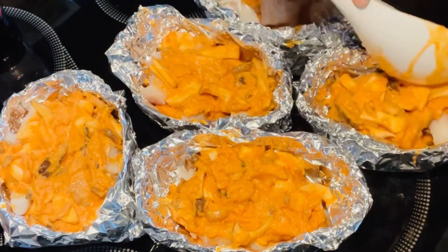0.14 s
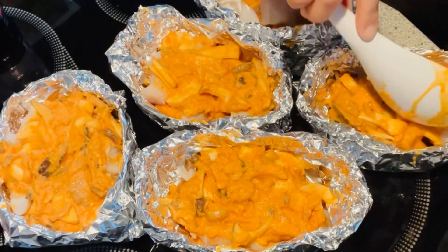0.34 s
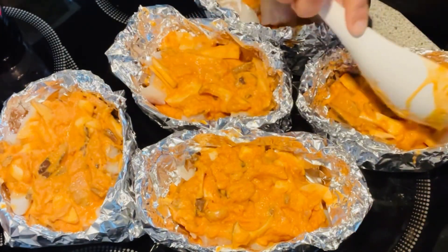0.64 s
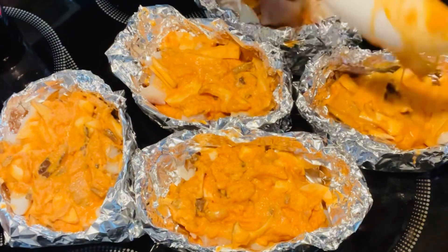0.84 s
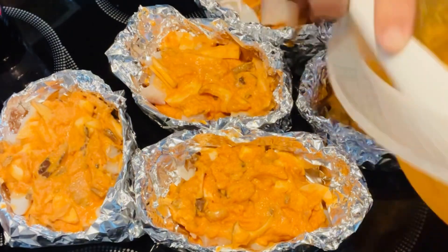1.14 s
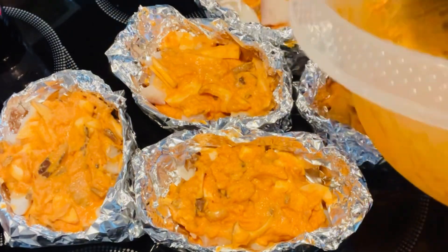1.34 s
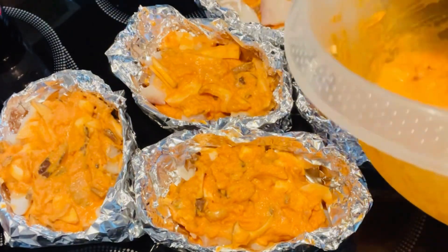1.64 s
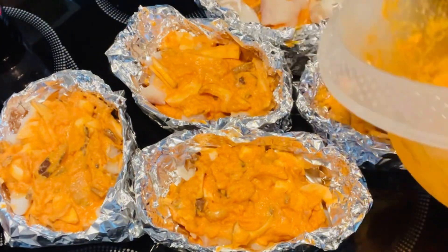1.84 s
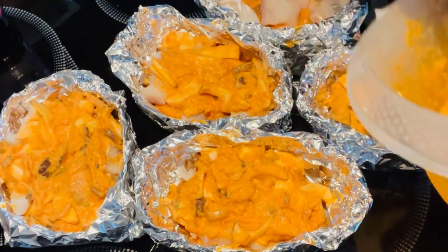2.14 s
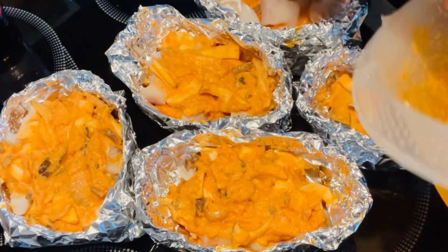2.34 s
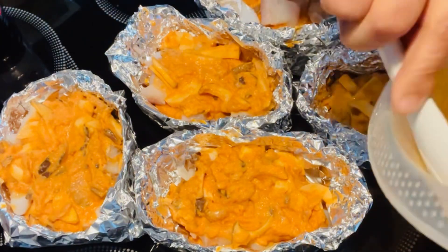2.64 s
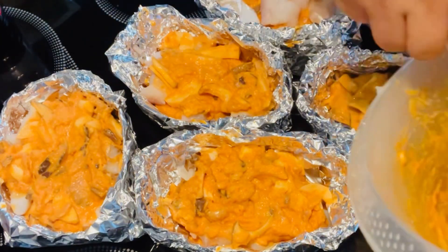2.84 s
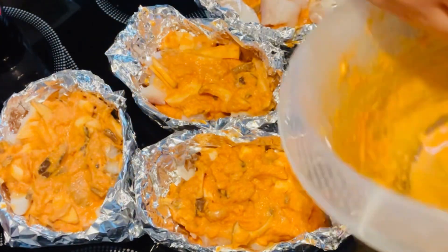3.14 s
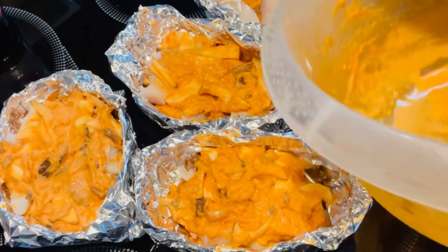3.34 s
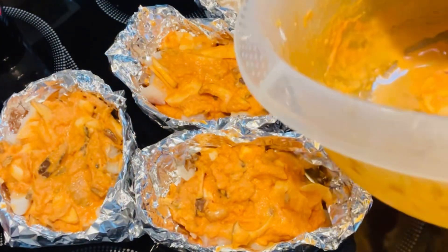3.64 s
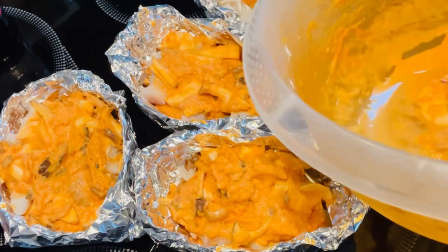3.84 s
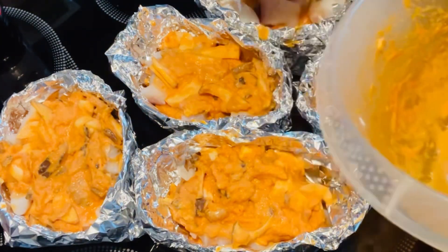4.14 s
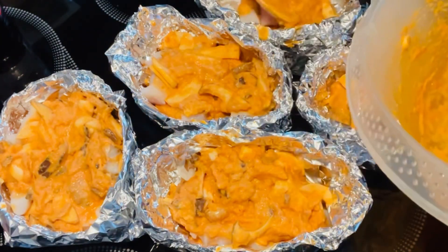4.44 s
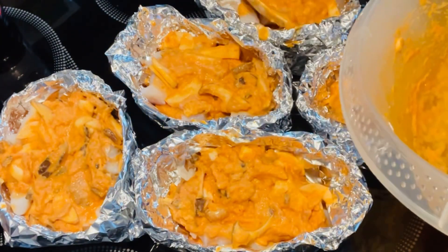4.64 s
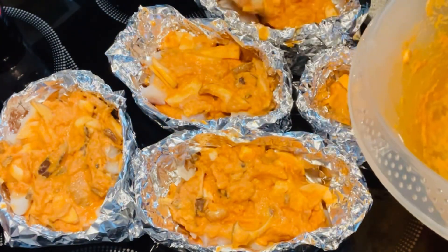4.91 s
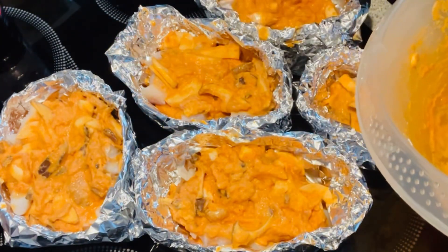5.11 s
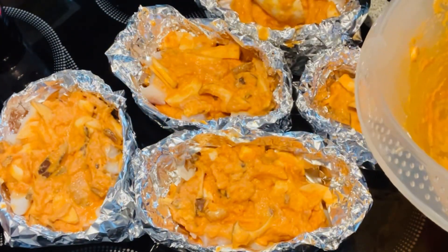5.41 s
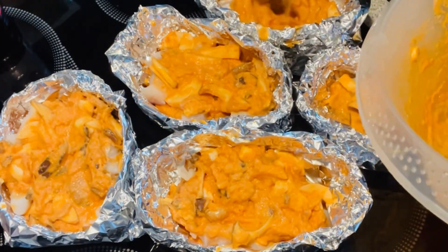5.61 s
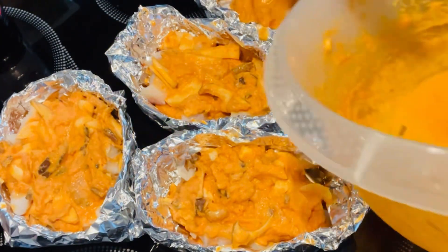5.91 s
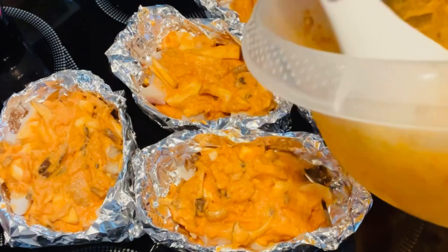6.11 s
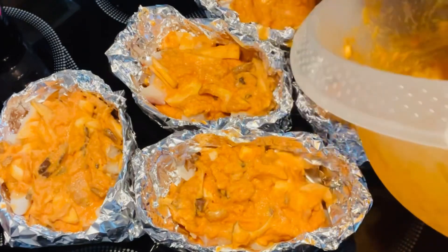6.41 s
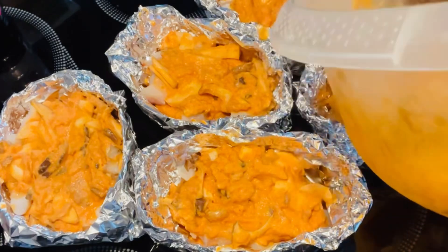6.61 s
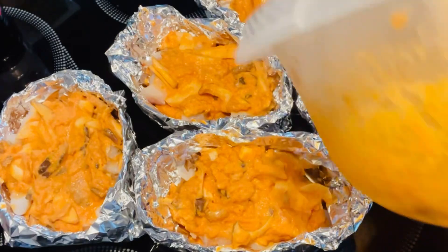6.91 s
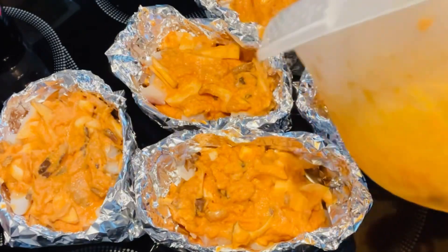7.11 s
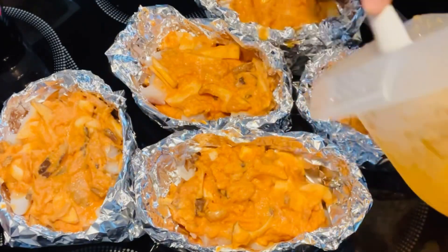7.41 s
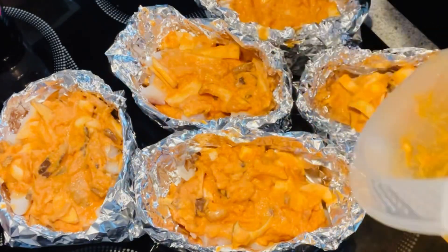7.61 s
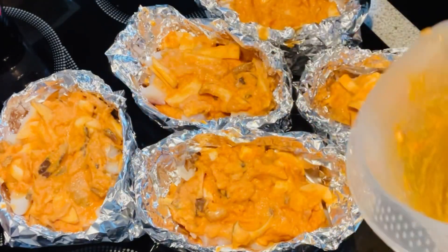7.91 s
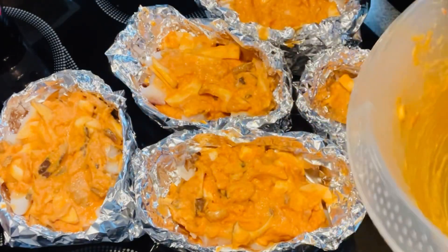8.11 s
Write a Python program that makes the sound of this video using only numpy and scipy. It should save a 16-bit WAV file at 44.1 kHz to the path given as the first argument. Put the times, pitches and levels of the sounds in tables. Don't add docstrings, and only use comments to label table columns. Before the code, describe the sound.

Hollow plastic bowl knocks and gritty spoon scrapes come in two busy bursts, split by a quiet spell of foil snaps and sauce bubbles.

```python
import sys
import numpy as np
from scipy import signal
from scipy.fft import rfft, irfft, next_fast_len
from scipy.io import wavfile

SR = 44100
rng = np.random.default_rng(int(sys.argv[2]) if len(sys.argv) > 2 else 0)


def boost(x):
    u = np.asarray(x, float) / 20
    return 10 ** u


def store_pcm(level_fs):
    pcm = np.round(np.clip(level_fs, -1, 1) * 32767).astype(np.int16)
    wavfile.write(sys.argv[1], SR, np.atleast_2d(pcm).T)


N = 364266


def rms_one(x):
    return x / np.sqrt(np.mean(x ** 2) + 1e-20)


def drift(rate_hz):
    pole = np.exp(-2 * np.pi * rate_hz * 40 / SR)
    noise = rng.standard_normal(N // 40 + 2002)
    slow = signal.lfilter([1], [1, -2 * pole, pole * pole], noise)[2000:]
    return np.interp(np.arange(N) / 40, np.arange(len(slow)), rms_one(slow))


def ring(drive, hz, t60_s):
    radius, w = boost(-60 / (t60_s * SR)), 2 * np.pi * hz / SR
    return signal.lfilter([0, np.sin(w)], [1, -2 * radius * np.cos(w), radius * radius], drive + 1e-18)


def colour(x, spectrum):
    hz, db = np.transpose(spectrum)
    size = next_fast_len(N)
    log_hz = np.log(np.fft.rfftfreq(size, 1 / SR) + 1)
    gain_db = np.interp(log_hz, np.log(hz), db, left=-80, right=db[-1])
    return rms_one(irfft(rfft(x, size) * boost(gain_db), size)[:N])


def grit(slips_per_s, spread_db):
    sizes = boost(spread_db * np.minimum(rng.exponential(1, N), 5))
    signs = rng.choice([-1, 1], N)
    return rms_one(sizes * signs * (rng.random(N) < slips_per_s / SR))


def grains(slips_per_s, low_hz, high_hz, cycles):
    slips = grit(slips_per_s, 2.7)
    dealt = rng.integers(0, 11, N)
    pitches_hz = np.geomspace(low_hz, high_hz, 11) * rng.uniform(.97, 1.03, 11)
    return rms_one(sum(ring(slips * (dealt == k), hz, cycles / hz) for k, hz in enumerate(pitches_hz)))


def patchy(x, edges_hz, patch_db, rate_hz):
    out = np.zeros(N)
    for k, band_hz in enumerate(zip(edges_hz, edges_hz[1:])):
        sos = signal.butter(2, band_hz, "band", fs=SR, output="sos")
        out += (-1) ** k * boost(patch_db * drift(rate_hz)) * signal.sosfilt(sos, x)
    return out


def swells(start_s, length_s, levels_db, pace_db_per_s):
    rise, fall = pace_db_per_s
    t, power = np.arange(N // 64 + 2) * 64 / SR, 0
    for s, hold_s, db in zip(start_s, length_s, levels_db):
        short_db = rise * np.maximum(s - t, 0) + fall * np.maximum(t - s - hold_s, 0)
        power = power + boost(db - np.minimum(short_db, 120)) ** 2
    return np.interp(np.arange(N) / SR, t, np.sqrt(power))


def rough_tones(modes, wander_db):
    white = rng.standard_normal(N)
    return sum(boost(db + wander_db * drift(2.2)) * rms_one(ring(white, hz, 2.0 / width_hz))
               for hz, width_hz, db in modes)


def struck(modes, s, levels_db, favoured_hz, lag_cycles, rise_cycles, focus_db, luck_db):
    out, luck = np.zeros(N), rng.standard_normal((len(s), len(modes)))
    for k, (hz, db, t60_s) in enumerate(modes):
        clicks = np.zeros(N)
        off_db = np.minimum(focus_db * np.abs(np.log2(hz / favoured_hz)), 14)
        at = ((s + lag_cycles / hz) * SR).astype(int)
        clicks[at] = boost(levels_db + db - off_db + luck_db * luck[:, k])
        out += ring(clicks, hz, t60_s) - ring(clicks, hz, rise_cycles / hz)
    return out


def bent_rings(rows, rise_cycles, sag_cycles):
    out, t = np.zeros(N), np.arange(int(.25 * SR)) / SR
    for s, db, hz, t60_s in rows:
        x = t * hz
        turns = x + sag_cycles * (1 - np.exp(-x))
        shape = boost(db - 60 * t / t60_s) * (1 - np.exp(-x / rise_cycles))
        out[int(s * SR):][:len(t)] += shape * np.sin(2 * np.pi * turns)
    return out


# throbs_off_tone, rms_db
HUM = [(0, -57.5), (1, -67), (-1, -80)]
# pitch_hz, width_hz, level_db
MOTOR = [(98.24, 2.6, -67), (154.4, 4.1, -75.5), (3240, 140, -76.5), (4070, 68, -83.5), (4275, 150, -83),
         (5130, 65, -79.5), (5470, 62, -82.5), (7500, 150, -89)]
# start_s, length_s, level_db
DRONE = [(0.517, 0.38, -67), (0.905, 0.15, -62.5), (3.22, 0.11, -68.5), (3.406, 0.13, -60.5),
         (3.794, 0.068, -78), (4.051, 0.12, -74), (4.306, 0.3, -70), (4.617, 0.075, -69),
         (4.779, 0.046, -69), (4.881, 0.16, -68), (5.126, 0.036, -67), (5.36, .05, -69),
         (5.475, 0.064, -66), (5.706, 0.1, -71.5), (5.885, 0.2, -65.5)]
# pitch_hz, width_hz, level_db
DRONE_MODES = [(297, 9.3, 1), (340, 25, 0.5), (420.5, 25, -3), (517, 27, -7.5), (590, 37, -3.5),
               (764, 490, -6.5), (1020, 110, -21)]
# freq_hz, level_db_per_hz
RUMBLE = [(44, -28.5), (75, -6), (161, -7), (240, -15), (500, -20.5), (699, -22.5), (1300, -28),
          (1900, -67)]
# freq_hz, level_db_per_hz
HISS = [(760, -39), (1300, -13), (2060, -12.5), (3420, -4.5), (4440, -3), (8520, -13), (10400, -20),
        (16000, -22.5)]


def kitchen_hum():
    motor_hz, throb_hz, throb_top_s = 50.53, 2.52, 4.27
    drone_pace_db_per_s = (140, 230)
    t = np.arange(N) / SR - throb_top_s
    hum = sum(boost(db) * np.sqrt(2) * np.sin(2 * np.pi * (motor_hz + k * throb_hz) * t) for k, db in HUM)
    drone = swells(*np.transpose(DRONE), drone_pace_db_per_s) * rms_one(rough_tones(DRONE_MODES, 4.2))
    rumble = boost(-66.5 + 1.7 * drift(1.3)) * colour(rng.standard_normal(N), RUMBLE)
    hiss_gain = boost(-70.5 + 1.3 * drift(3.0))
    air = colour(rng.standard_normal(N), HISS)
    hiss = hiss_gain * patchy(air, [600, 2800, 5500, 9000, 17000], 1.4, 6.0)
    buzz = swells([0], [0.48], [0], drone_pace_db_per_s) * rough_tones([(166, 6.0, -66)], 3.3)
    hum *= boost(.7 * drift(3))
    return hum + buzz + rough_tones(MOTOR, 1.5) + drone + rumble + hiss


def room(x):
    t60_s, wall_cut_hz = 0.41, 4200
    size = next_fast_len(N + SR)
    w = 2 * np.pi * np.fft.rfftfreq(size, 1 / SR)
    dull = 1 / (1 + 1j * w / (2 * np.pi * wall_cut_hz))
    echoes = 0
    for k, lag_s in enumerate(rng.uniform(0.0083, 0.03, 8)):
        loop = boost(-60 * lag_s / t60_s) * dull * np.exp(-1j * w * lag_s)
        echoes = echoes + (-1) ** k * loop / (1 - loop)
    return irfft(rfft(x, size) * echoes, size)[:N]


# start_s, peak_db, pitch_hz
PLOPS = [
    (5.1143, -51, 1530),
    (5.322, -52.5, 1370),
    (5.362, -47.5, 1324),
    (5.455, -52, 1570),
    (5.6235, -50, 1590),
    (5.469, -55, 1550),
]


def plops():
    out, t = np.zeros(N), np.arange(int(.05 * SR)) / SR
    uneven = boost(5 * drift(250) - 7)
    for s, db, hz in PLOPS:
        shape = boost(db - 60 * t / 0.046) * np.minimum(t / 0.00096, 1)
        overtone = 0.83 * np.sin(2 * np.pi * 1.96 * hz * t)
        out[int(s * SR):][:len(t)] += shape * (np.sin(2 * np.pi * hz * t) + overtone)
    return out * uneven


def snaps(rows, octaves, click_db):
    lag_s, rise_s = .001, .0007
    out, rough = np.zeros(N), grit(12000, 3)
    t, half = np.arange(int(.12 * SR)) / SR, 2 ** (octaves / 2)
    for s, db, hz, t60_s in rows:
        i = int((s + lag_s) * SR)
        band = signal.butter(2, [hz / half, hz * half], "band", fs=SR, output="sos")
        dying = boost(-60 * t / t60_s) + 1.7 * boost(-60 * t / 0.0067)
        push = rough[i:i + len(t)] * dying * np.minimum(t / rise_s, 1)
        push[0] += boost(click_db)
        burst = signal.sosfilt(band, push)
        out[i:i + len(t)] += boost(db - 19.0) * burst / np.sqrt(np.mean(burst[:130] ** 2))
    return out


# start_s, peak_db, centre_hz, t60_s
SNAPS = [(0.2423, -33, 3800, 0.081), (0.2992, -28, 6000, 0.043), (0.3336, -35, 5400, 0.018),
         (0.5477, -39, 5860, .072), (0.595, -28.5, 4180, 0.056), (2.1994, -19, 3000, 0.071),
         (2.4754, -19.5, 2840, 0.046), (2.558, -36, 7000, 0.061), (4.0607, -28.5, 2883, 0.066),
         (4.6458, -41, 3340, 0.032), (5.1153, -33.5, 3860, 0.068), (5.3134, -31, 7500, .034),
         (5.3208, -20, 4310, 0.044), (5.3607, -30, 3040, 0.13), (5.3714, -33.5, 3200, 0.1),
         (6.6867, -38.5, 2490, 0.078), (7.0774, -21.5, 1950, 0.042), (7.7069, -32, 2990, 0.26),
         (7.7717, -32, 6350, 0.048), (7.9089, -25.5, 2980, 0.086)]


def foil_snaps():
    return snaps(SNAPS, octaves=2.6, click_db=10)


# start_s, peak_db, centre_hz, t60_s
CATCHES = [(0.7602, -40, 5600, .04), (1.7484, -12.5, 4800, 0.066), (1.8272, -22, 3760, 0.019),
           (2.29, -45, 3700, 0.18), (2.302, -30, 5300, 0.07), (2.4414, -28, 3800, .12),
           (2.8649, -22.5, 4340, 0.038), (2.9173, -24, 2970, 0.045), (2.9407, -15.5, 2900, 0.067),
           (2.9594, -30, 4650, .03), (2.9983, -27, 4500, .03), (3.0826, -33, 4500, .03),
           (1.4433, -34, 3000, 0.033), (1.508, -37, 1800, .03), (2.1772, -43, 3540, 0.023),
           (6.347, -28, 3000, .03), (6.743, -23, 1130, 0.036), (7.0445, -27, 3180, .03),
           (7.117, -20, 1510, .03), (7.126, -24, 2010, .03), (7.891, -39, 4500, 0.025),
           (3.258, -44.5, 4810, 0.03), (6.309, -24, 1440, 0.12), (6.398, -29.5, 1700, 0.08),
           (6.6204, -25, 1680, 0.032), (6.6548, -23, 4400, 0.062), (7.6171, -27, 3040, 0.026),
           (7.6745, -24, 1580, 0.089), (7.8012, -26, 5200, 0.027), (7.8376, -15.5, 2740, 0.055),
           (7.9269, -28, 2500, 0.04), (7.845, -21, 2980, 0.045), (1.2345, -16, 4500, .03),
           (1.762, -26, 7000, .05), (1.834, -30, 6000, .04), (1.863, -17, 3560, .03),
           (2.93, -23, 4500, .02), (3.022, -16, 3240, .04), (3.0465, -33, 4600, .03)]


def edge_catches():
    return snaps(CATCHES, octaves=1.36, click_db=21)


# start_s, length_s, level_db
RUSTLE = [
    (0.235, .11, -59),
    (0.544, 0.13, -64),
    (0.696, 0.26, -77.5),
    (3.396, 0.32, -85),
    (4.059, 0.0078, -54.5),
    (4.463, 0.11, -82),
    (4.647, 0.036, -66.5),
    (5.114, .01, -64),
    (5.318, 0.0096, -52),
    (5.551, 0.28, -72),
]
# freq_hz, level_db_per_hz
FOIL = [(800, 3.5), (1500, 7.5), (4000, 5), (8000, 5), (12000, -2), (15500, -1)]


def foil_crinkle(foil_gain, fine):
    sheet = colour(fine, FOIL)
    crinkle = rms_one(.55 * grains(2500, 5000, 15500, 60) + sheet)
    rustle = swells(*np.transpose(RUSTLE), (3300, 310)) * boost(3.1 * drift(66)) * sheet
    return foil_gain * crinkle + rustle


def judder():
    s, wall_db = np.transpose(KNOCKS)[:2]
    return swells(s + .008, 0 * s, wall_db - 19, (6000, 394))


# start_s, length_s, wall_db, edge_db, foil_db
STROKES = [(0.03, 0.14, -80, -76, -81), (0.174, 0.32, -69.5, -88, -87), (1.08, 0.18, -60.5, -67, -73),
           (1.232, 0.059, -52.5, -57, -52.5), (1.333, 0.06, -55, -51.5, -46.5),
           (1.41, 0.1, -52.5, -65.5, -64), (1.653, 0.086, -71, -55.5, -71), (1.745, .12, -58, -55.5, -48.5),
           (2.056, 0.095, -56, -49, -48.5), (2.164, 0.071, -47, -55, -51), (2.29, 0.015, -47.5, -53, -47),
           (2.44, 0.018, -47, -47.5, -39), (2.688, 0.16, -75, -53.5, -50), (2.863, 0.12, -56, -52, -51),
           (3.01, 0.036, -64, -49, -50.5), (3.247, 0.048, -68, -68, -71),
           (6.161, 0.113, -58.5, -57.5, -50.5), (6.273, 0.085, -51, -57, -57),
           (6.576, 0.2, -58, -56.5, -54.5), (6.617, 0.21, -59.5, -56.5, -54.5),
           (7.001, 0.13, -58.5, -50.5, -51), (7.349, 0.078, -57, -47.5, -63),
           (7.426, 0.29, -58.5, -54.5, -52.5), (7.717, 0.21, -59.5, -56, -55.5),
           (7.965, 0.26, -66.5, -70, -72.5)]
# start_s, length_s, level_db
SPOON_RUBS = [(1.062, 0.18, -63.5), (1.22, 0.018, -46.5), (1.353, 0.054, -55.5), (1.427, 0.059, -61.5),
              (1.644, 0.045, -49), (1.75, 0.12, -54.5), (2.037, 0.079, -51), (2.174, 0.042, -49.5),
              (2.298, 0.011, -54.5), (2.426, 0.052, -50.5), (2.684, 0.084, -48.5), (2.903, 0.098, -53.5),
              (3.032, 0.095, -61), (3.258, 0.052, -68), (6.14, 0.15, -60), (6.292, 0.027, -60),
              (6.394, 0.02, -61.5), (6.589, .05, -58.5), (6.668, 0.088, -51.5), (6.786, .03, -63),
              (7.033, 0.075, -50.5), (7.35, 0.066, -47.5), (7.494, 0.14, -56), (7.716, 0.19, -57),
              (7.967, 0.18, -70)]
# pitch_hz, level_db, t60_s
RUBBED_WALL = [(328.4, -4, 0.034), (377.5, -3, 0.034), (460, -8.5, .03), (553.3, 4.5, 0.026),
               (620, -2, 0.036), (740, -1, 0.027), (877, -1, 0.025), (1020, -9.5, 0.0343)]
# pitch_hz, level_db, t60_s
LIP = [(1625, -3, .17), (1668, 0, .22), (1735, -2, .17), (1030, -6, .2)]
# freq_hz, level_db_per_hz
EDGE = [(1800, -9), (2700, -2.5), (3600, 9.5), (5000, -4), (6500, -17.5), (8500, -3.5)]


def scrape():
    s, length_s, wall_db, edge_db, foil_db = np.transpose(STROKES)
    foil_lag_s = 0.017
    chatter = judder()
    wall_gain = swells(s, length_s, wall_db, (3300, 710)) + chatter
    spoon_gain = swells(*np.transpose(SPOON_RUBS), (1800, 160)) + boost(-12) * chatter
    edge_gain = swells(s, length_s, edge_db, (2400, 230))
    foil_gain = swells(s + foil_lag_s, length_s - foil_lag_s, foil_db, (1500, 680))

    slips, fine = grit(5000, 2), grit(9000, 2)
    grip, creep = boost(2.2 * drift(60)), boost(2.5 * drift(70))
    wall = sum(boost(db) * ring(slips, hz, t60_s) for hz, db, t60_s in RUBBED_WALL)
    body = sum(boost(db + part_db) * ring(slips, hz, min(0.38 * t60_s, .045))
               for modes, part_db in [(LIP, -7), (SPOON, 0)] for hz, db, t60_s in modes)
    body = patchy(body, [800, 1350, 4000], 2, 15)
    shell = sum(boost(db) * ring(slips, hz, .5 * t60_s) for hz, db, t60_s in SHELL)
    rasp = rms_one(.9 * rms_one(shell) + .6 * grains(1200, 2300, 7500, 40) + colour(fine, EDGE))
    rasp = patchy(rasp, [900, 2400, 4000, 6500, 12000], 1.8, 25)
    rubbed = wall_gain * rms_one(wall) + spoon_gain * rms_one(body) + edge_gain * rasp
    return grip * rubbed + foil_crinkle(foil_gain * creep, fine)


def cracks(s, levels_db, spectrum, t60_s, tail_db):
    clicks = np.zeros(N)
    clicks[(s * SR).astype(int)] = boost(levels_db)
    quick, slow = boost(-60 / (t60_s * SR)), boost(-60 / (.16 * SR))
    dying = signal.lfilter([1], [1, -quick], clicks)
    dying += boost(tail_db) * signal.lfilter([1], [1, -slow], clicks)
    dying = signal.lfilter([.1], [1, -.9], dying)
    return dying * colour(grit(9000, 1.0), spectrum)


# start_s, spoon_db, favoured_hz, crack_db, bright_crack_db
TAPS = [(1.2141, -18, 1860, -29.5, -23.5), (1.2394, -28, 2000, -36, -24.5), (1.3468, -24.5, 1850, -35, -55),
        (1.6411, -13.5, 2440, -25.5, -38), (1.858, -26.5, 1300, -31.5, -35), (2.04, -13.5, 1370, -18, -45),
        (2.207, -26.5, 1020, -37, -45), (2.3875, -32.5, 1280, -50, -64), (2.4665, -27.5, 990, -40, -38),
        (2.6612, -18, 1100, -18, -35), (3.0172, -29.5, 1050, -34, -42), (3.1101, -31, 1030, -42.5, -51),
        (6.1077, -20, 2380, -28, -24), (6.172, -28, 1440, -30.5, -43), (6.351, -59, 1790, -48, -47),
        (6.574, -43, 1510, -47, -53), (6.7198, -34, 1020, -40, -37), (6.7658, -22.5, 1260, -32.5, -42),
        (7.008, -19.5, 2000, -37.5, -48), (7.112, -27.5, 1466, -42.5, -45), (7.3329, -21.5, 1410, -16, -63),
        (7.4801, -35, 1650, -30.5, -23.5), (7.708, -37, 1600, -46, -55)]
# pitch_hz, level_db, t60_s
SPOON = [(1014, -1, 0.037), (1113, 6, 0.031), (1466, 4.5, 0.026), (1650, -20, 0.032), (1650, 8, 0.025),
         (1986, 3, 0.024), (2073, -7, 0.072), (2586, -5, 0.017)]
# pitch_hz, level_db, t60_s
SHELL = [(2390, -5, .06), (2760, -5, .07), (3040, -5, .08), (3370, -4, .09), (3750, -3, .08),
         (4100, -4, .07), (4780, -5, .09), (5400, -7, .07), (7000, -14, .06), (7840, -16, .05)]
# start_s, peak_db, pitch_hz, t60_s
LIP_RINGS = [(1.217, -40, 2380, .08), (1.643, -50, 1900, 0.15), (1.643, -38, 2300, 0.11),
             (2.042, -42, 1655, 0.18), (2.042, -37.5, 2125, 0.2), (2.664, -30, 1587, 0.21),
             (2.664, -31.5, 1685, 0.27), (2.664, -36.5, 1120, 0.13), (2.664, -35.5, 2000, .12),
             (2.664, -39, 2790, 0.22), (2.664, -41, 3023, 0.17), (6.109, -44, 1430, 0.11),
             (7.01, -44, 1510, 0.081), (7.01, -51.5, 1400, 0.087), (7.01, -46, 1826, 0.22),
             (7.343, -24, 1770, 0.073), (7.334, -33.5, 1693, 0.27), (7.334, -33, 1403, 0.2),
             (7.334, -40.5, 1037, 0.16), (7.334, -36, 3780, .15)]
# start_s, peak_db, pitch_hz, t60_s
PINGS = [(1.2143, -26, 1820, 0.026), (1.2143, -27, 2410, .03), (1.2143, -30, 2710, .03),
         (1.238, -24.5, 1430, 0.024), (1.6412, -25.5, 2130, 0.017), (1.6412, -25, 2400, 0.023),
         (1.6412, -20, 3060, 0.02), (1.6412, -24, 3460, 0.022), (2.04, -18, 1148, 0.032),
         (2.04, -25, 1700, .03), (2.0405, -37, 4100, 0.036), (2.0405, -24.5, 5060, 0.041),
         (2.6625, -8.5, 996, 0.019), (2.662, -9.5, 1700, 0.024), (2.662, -15, 2050, 0.034),
         (2.6612, -21.5, 3070, 0.033), (3.022, -23.5, 1143, 0.026), (6.765, -27, 1536, .03),
         (7.008, -7.5, 1433, 0.021), (7.3328, -11.5, 1754, 0.036), (7.3325, -19.5, 3380, 0.028),
         (7.3322, -17, 3800, 0.019)]
# freq_hz, level_db_per_hz
CRACK = [(1800, -5.5), (2400, -4), (4500, -3.5), (6500, -14.5), (9000, -32), (13000, -44.5)]
# freq_hz, level_db_per_hz
BRIGHT = [(5500, -3.5), (8000, -7), (12000, -10), (15800, -4)]


def spoon():
    s, spoon_db, spoon_hz, crack_db, bright_db = np.transpose(TAPS)
    unsteady = boost(3 * drift(70))
    rings = bent_rings(LIP_RINGS, rise_cycles=2.7, sag_cycles=0)
    rings += struck(SHELL, s, crack_db - 16.5, 3500, 0.54, 8.52, focus_db=-1.0, luck_db=3)
    modes = struck(SPOON, s, spoon_db - 6.0, spoon_hz, 0.68, 0.82, focus_db=31.5, luck_db=2.5)
    pings = bent_rings(PINGS, rise_cycles=1.2, sag_cycles=0)
    contact = cracks(s, crack_db + 0.5, CRACK, 0.019, -17.5) + cracks(s, bright_db, BRIGHT, 0.015, -14.0)
    return modes + unsteady * rings + pings + contact


def thuds(s, levels_db, patch_hz, cycles):
    out, t = np.zeros(N), np.arange(int(0.043 * SR)) / SR
    for at, db, hz in zip((s * SR).astype(int), levels_db, patch_hz):
        x = t * hz / cycles
        out[at:at + len(t)] += boost(db) * x * np.exp(1 - x) * np.sin(2 * np.pi * hz * t)
    return out


# start_s, wall_db, rim_db, boom_db, struck_patch_hz
KNOCKS = [(1.218, -24.5, -29, -28, 590), (1.6439, -23, -53, -29, 654), (1.781, -45, -73, -53.5, 560),
          (1.86, -34, -62, -60, 620), (2.042, -14.5, -18, -35, 560), (2.119, -31, -43, -46, 477),
          (2.209, -32, -60, -60, 620), (2.238, -36.5, -53, -55, 460), (2.388, -34.5, -35, -46.5, 480),
          (2.468, -31, -68, -45, 620), (2.664, -5, -13.5, -30, 528), (3.021, -30.5, -59, -46, 492),
          (3.111, -39.5, -54, -57.5, 475), (3.701, -54.5, -64.5, -67, 620), (6.108, -27, -63.5, -32, 590),
          (6.17, -40, -44, -59, 539), (6.351, -26, -34.5, -44.5, 535), (6.575, -45.5, -61, -44, 633),
          (6.767, -30, -42, -54, 580), (7.0101, -10.5, -14.5, -52, 566), (7.114, -22.5, -32, -65, 574),
          (7.336, -16, -20.5, -23, 590), (7.481, -38.5, -66, -65, 510), (7.698, -46.5, -59, -53, 450),
          (8.114, -45.5, -61, -60.5, 545)]
# pitch_hz, level_db, t60_s
WALL = [(446, -3, 0.048), (528, -6, 0.13), (582, -3, 0.073), (622, -5, 0.033), (735, -7.5, 0.036)]
# pitch_hz, level_db, t60_s
RIM = [(331, -17, 0.21), (376, -4, 0.19), (411.2, -11.5, 0.19)]
# pitch_hz, level_db, t60_s
BOOM = [(76.7, -19, 0.36), (107.2, 1.5, 0.22), (129, 4, 0.11)]
# start_s, peak_db, pitch_hz, t60_s
BELLY = [(1.218, -20, 164, 0.069), (1.645, -41, 163, .08), (1.785, -38, 188, 0.066),
         (2.045, -28.5, 186, 0.2), (2.047, -21, 276, 0.069), (2.121, -16, 294, 0.021),
         (2.21, -41, 198, 0.096), (2.241, -34, 302, 0.065), (2.388, -18.5, 214, 0.026),
         (2.473, -33.5, 189, 0.076), (2.666, -24.5, 184, 0.12), (2.666, -20.5, 280, 0.07),
         (3.023, -29, 250, 0.035), (3.112, -40, 174.3, 0.085), (6.11, -29, 177, 0.053),
         (6.173, -35, 185, 0.14), (6.352, -20, 224, 0.066), (6.577, -33, 169, 0.094),
         (6.58, -29.5, 212, 0.092), (6.768, -30.5, 209, 0.1), (7.011, -21, 227, 0.1),
         (7.116, -32.5, 230.4, 0.11), (7.335, -19.5, 206, 0.13), (7.335, -22, 170, 0.14),
         (7.336, -25, 285, 0.081), (7.484, -46, 224, 0.1), (7.698, -44.5, 230, 0.12)]


def bowl():
    s, wall_db, rim_db, boom_db, patch_hz = np.transpose(KNOCKS)
    thud_lead_s = 0.00079
    thud = thuds(s - thud_lead_s, wall_db + 0.5, patch_hz, 0.81)
    wall = struck(WALL, s, wall_db - 8.0, patch_hz, 0.73, 1.3, focus_db=11.0, luck_db=8.0)
    rim = struck(RIM, s, rim_db - 0.5, 490, 0.56, 1.2, focus_db=3.0, luck_db=2.0)
    boom = struck(BOOM, s, boom_db + 0.5, 99, 0.68, 0.95, focus_db=1.0, luck_db=3.5)
    return thud + wall + rim + boom + bent_rings(BELLY, rise_cycles=0.3, sag_cycles=0.13)


def scene():
    near = bowl() + spoon() + foil_snaps() + edge_catches() + scrape() + plops()
    return (near + boost(-26) * room(near) + kitchen_hum())[None]


def roll_off(x):
    return signal.sosfilt(signal.butter(12, 17000, fs=SR, output="sos"), x)


def record(dry):
    low = signal.butter(10, 45, "high", fs=SR, output="sos")
    top = signal.cheby2(10, 60, 16800, fs=SR, output="sos")
    mix = signal.sosfilt(np.vstack([low, top]), dry)
    return roll_off(mix)


dry = scene()
out = record(dry)
store_pcm(out)
```